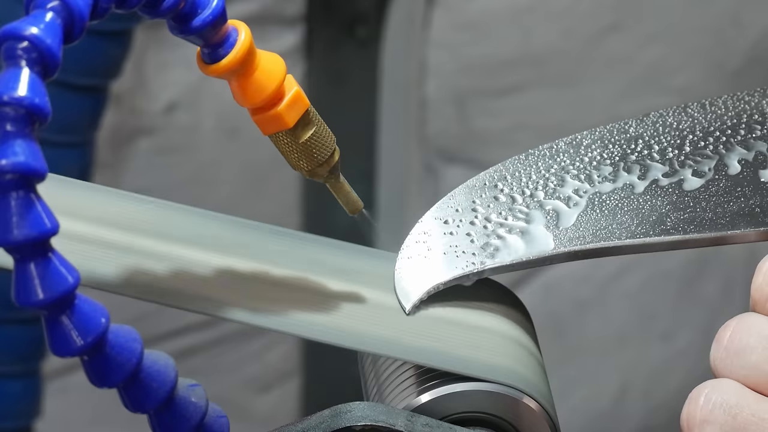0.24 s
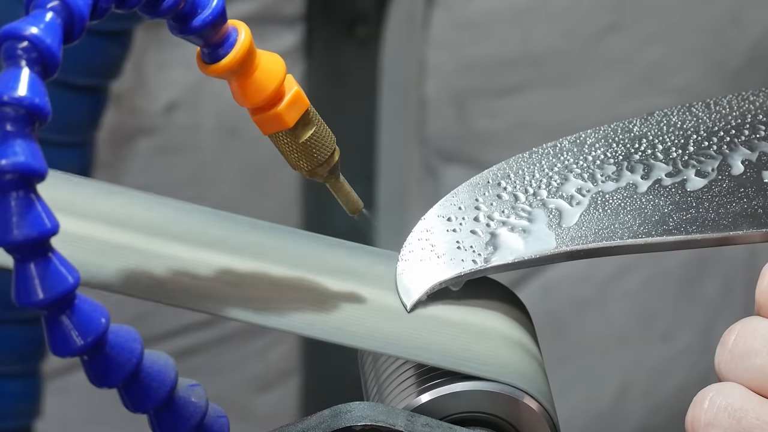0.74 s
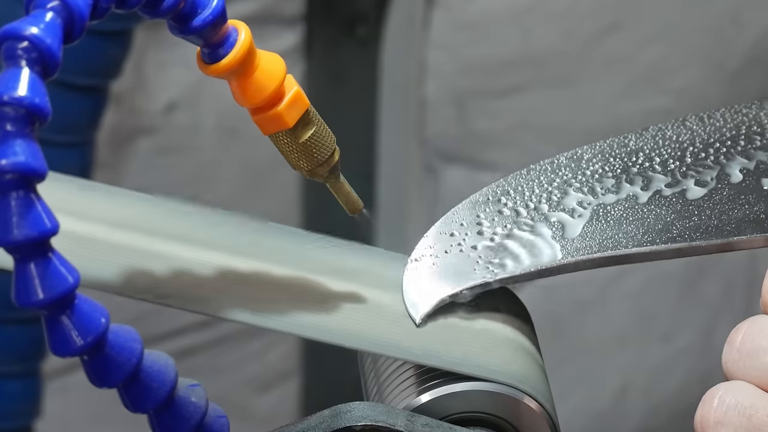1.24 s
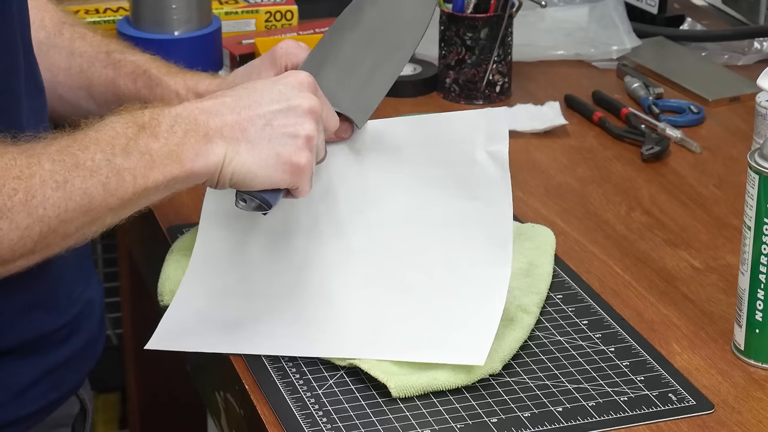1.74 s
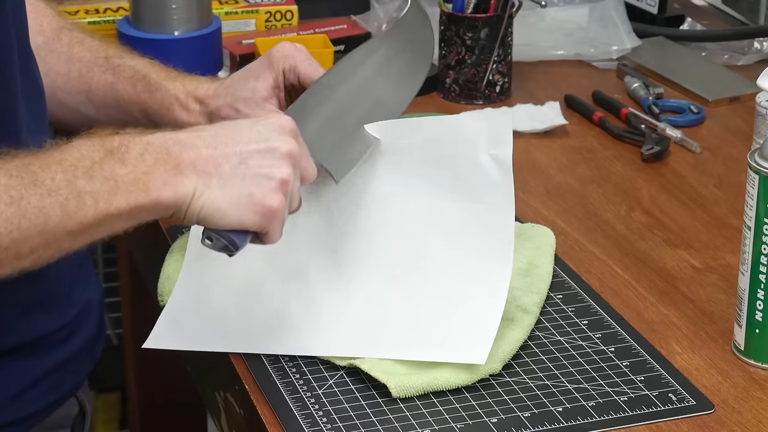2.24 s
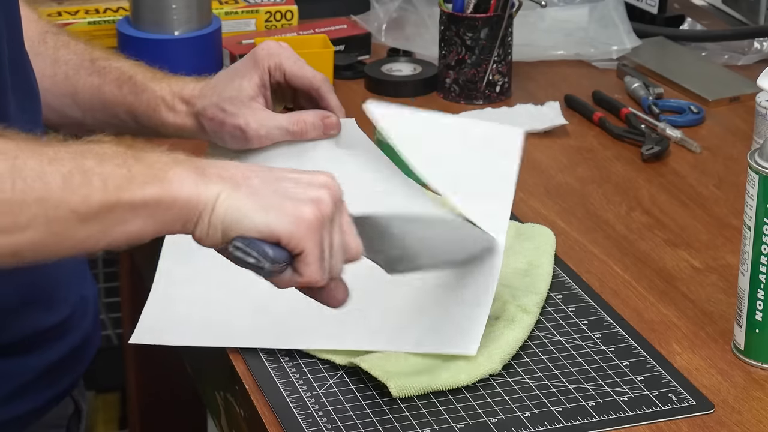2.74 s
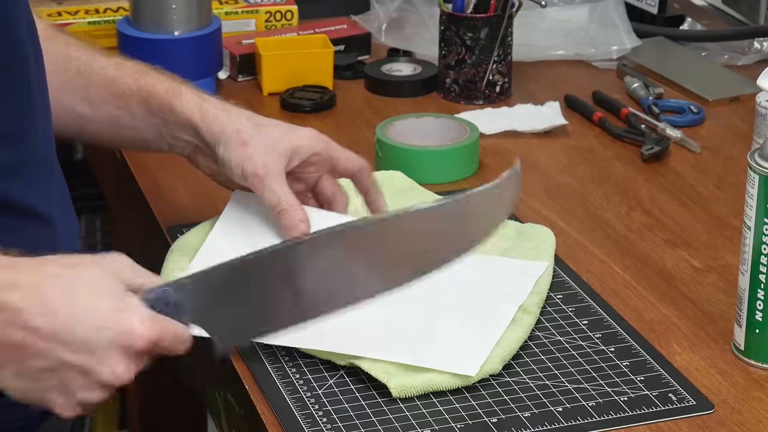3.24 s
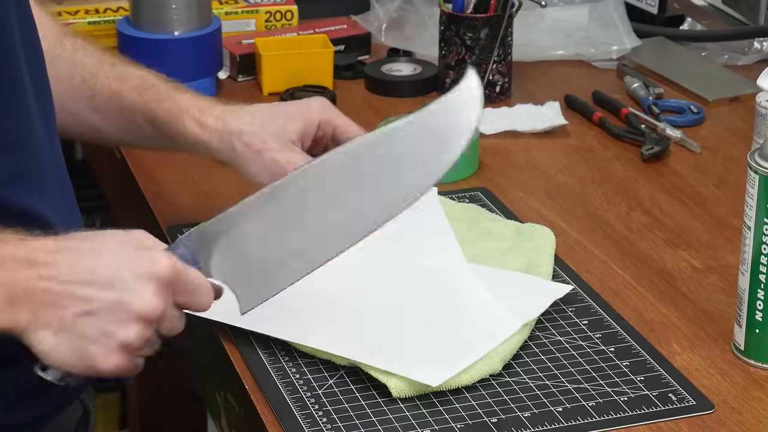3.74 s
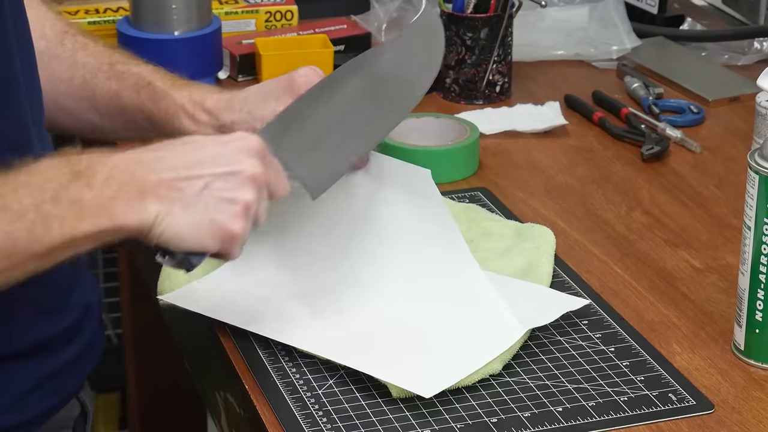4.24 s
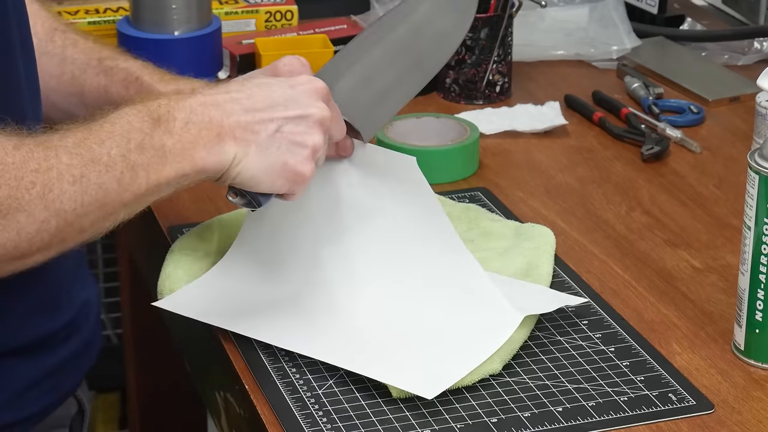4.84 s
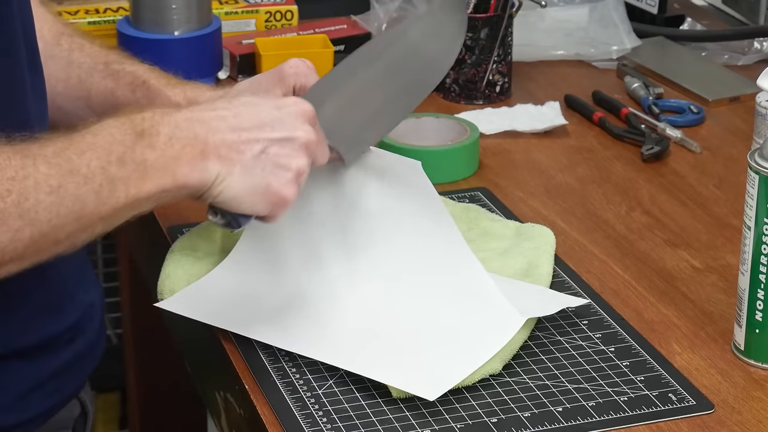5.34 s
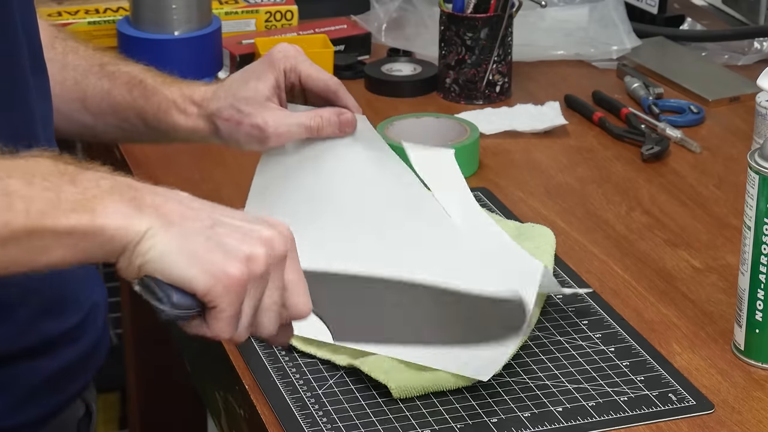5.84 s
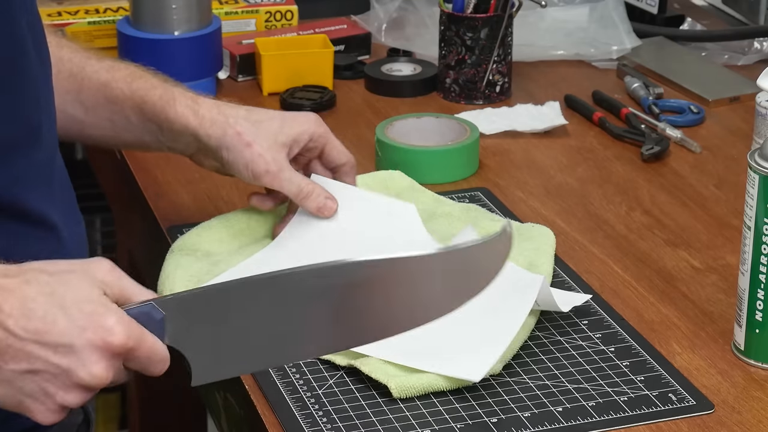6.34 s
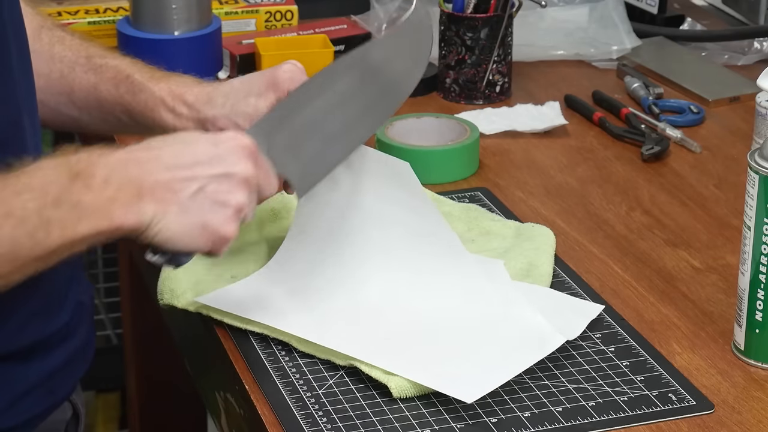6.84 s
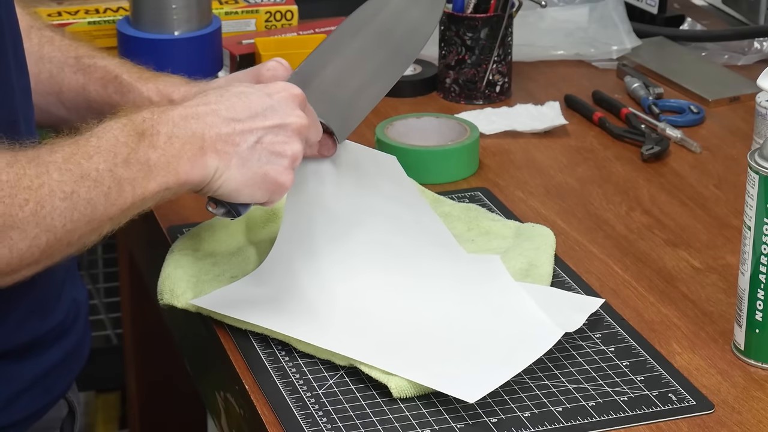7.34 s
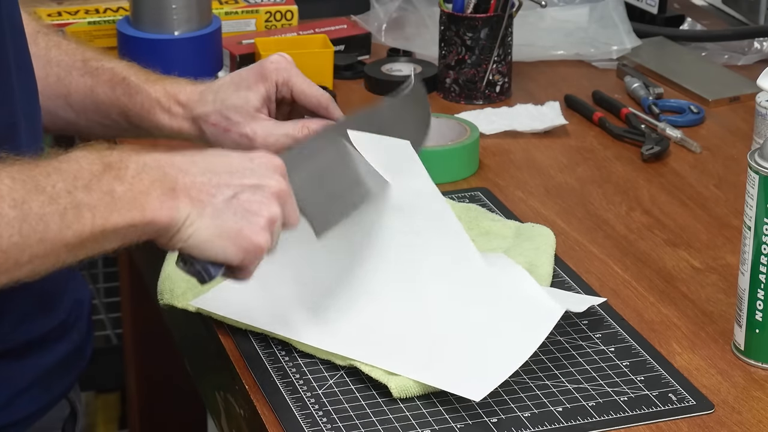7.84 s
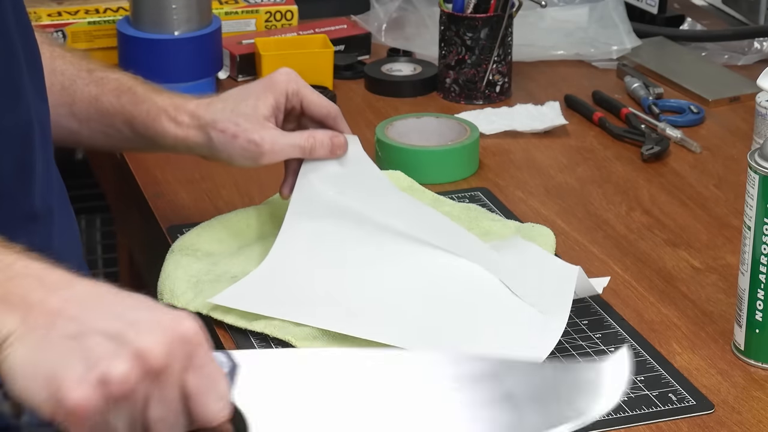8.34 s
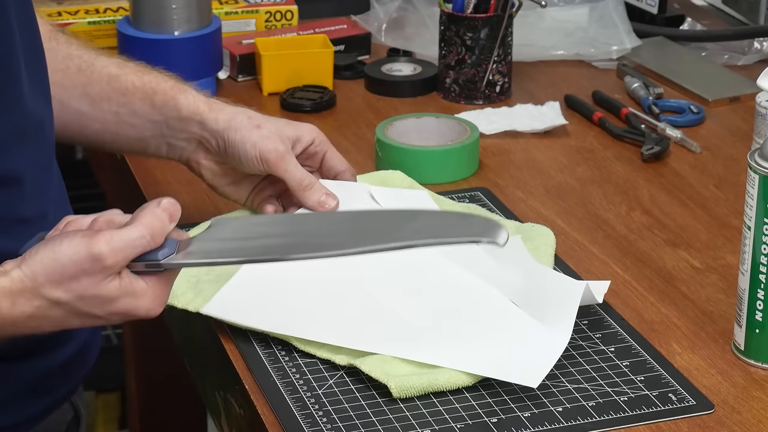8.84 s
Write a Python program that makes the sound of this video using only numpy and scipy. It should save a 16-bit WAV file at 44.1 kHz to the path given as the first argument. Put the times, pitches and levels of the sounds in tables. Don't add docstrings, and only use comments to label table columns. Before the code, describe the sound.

From 0 to 1.4 seconds a belt grinder runs close by: a dense bright hiss of grit and mist, with high, thin metallic whistles around it, wavering and beating as the blade rubs. It cuts abruptly to a quiet workshop with wide, soft air and faint low fan hum. Paper slides lightly; at 1.8 creases crackle and the taut sheet squeaks, rising in pitch near 2.1. A knife slices from 2.2 to 2.8, a crisp, fibrous rip that ends fizzy and fast. The sheets slide and flap, with a sharp pop at 3.8 and ticks until 4.4. After near quiet, snaps at 5.3 begin a second, quicker slice until about 5.9. Rustling and ticking continue to 6.9. Harder snaps at 7.6 start the third slice, rushing through until 8.15, with a soft landing. Light slides and small flaps close the scene near 9, in a short room.

```python
import sys
import numpy as np
from scipy import signal
from scipy.fft import rfft, irfft
from scipy.io import wavfile
from scipy.ndimage import uniform_filter1d

SR = 44100
rng = np.random.default_rng(int(sys.argv[2]) if len(sys.argv) > 2 else 0)


def dump_mix(stems):
    frames = np.atleast_2d(stems).T
    limited = np.clip(frames, -1, 1)
    pcm = np.round(limited * 32767).astype(np.int16)
    wavfile.write(sys.argv[1], SR, pcm)


def convert_level_to_amplitude(level_db):
    exponent = np.asarray(level_db, float) / 20
    return 10 ** exponent


N = 401310
HZ = np.fft.rfftfreq(8192, 1 / SR)


def evened(x):
    return x / np.sqrt(np.mean(x ** 2) + 1e-20)


def read(points, hz):
    f, value = np.transpose(points)
    return np.interp(np.log(hz + 1), np.log(f + 1), value)


def curves(rows):
    s, *columns = np.transpose(rows)
    return [np.interp(np.arange(N) / SR, s, c) for c in columns]


def coloured(x, gain):
    ceps = irfft(np.log(np.maximum(gain, 1e-5)))
    ceps[1:4096] *= 2
    ceps[4097:] = 0
    impulse = irfft(np.exp(rfft(ceps)))[None, :4096]
    return signal.oaconvolve(np.atleast_2d(x), impulse, axes=1)[:, :N]


def modes(table, sharp):
    return sum(convert_level_to_amplitude(db) ** 2 / (1 + (2 * (HZ - hz) / width) ** 2) ** sharp for hz, width, db in table)


def drift(per_s):
    points = rng.standard_normal(N // 256 + 2)
    slow = signal.filtfilt(*signal.butter(2, np.clip(per_s * 512 / SR, 1e-3, .9)), points)
    return np.interp(np.arange(N) / 256, np.arange(len(slow)), evened(slow))


def pair(gain, side_db, patchy_db, count):
    hz = HZ[::8]
    a, b, c, d, patches = rng.standard_normal((count // 256 + 5, len(hz), 5)).T
    patches = uniform_filter1d(patches, size=10, axis=0)
    patches = evened(uniform_filter1d(patches, size=12, axis=1))
    side = (c + 1j * d) * convert_level_to_amplitude(read(side_db, hz))[:, None]
    z = np.array([a + 1j * b, side]) * convert_level_to_amplitude(patchy_db * patches)
    noise = signal.istft(z, nperseg=1024, noverlap=768)[1][:, :count]
    mid, side = coloured(noise, gain)[:, :count]
    return np.array([mid + side, mid - side]) / np.std(mid)


def resonate(x, hz, width):
    turn = np.exp(2j * np.pi * np.cumsum(hz) / SR)
    r = np.exp(-np.pi * width / SR)
    return evened((turn * signal.lfilter([1 - r], [1, -r], x / turn)).real)


# (pitch [Hz], pitch waver [Hz], flutter [dB])
WHISTLES = [(3380, 10, 1.5), (6745, 12, 2), (5075, 20, 2.5), (8490, 18, 2), (11890, 25, 2), (1810, 6, 1.5)]
# (beat rate [1/s], rate change [1/s^2], depth [0-1], grit fuzz [dB])
BEATS = [(17.2, -7.5, .6, -10), (14, 2, 0.35, 0), (12, 0, 0.23, 1), (9, 1, .2, 3), (11, 1, .25, 8),
         (8, 1, .2, -2)]
# (time [s], level of each of six whistles [dB])
SING = [(0, -45, -46, -52, -47, -54, -54), (.3, -42, -45, -54, -46, -53, -53),
        (.5, -46.5, -38.5, -50, -44, -51, -53), (.8, -46, -40, -52, -45, -52, -53),
        (1, -48, -47.5, -57, -49, -55, -54), (1.15, -42, -39, -53, -44, -50, -53),
        (1.4, -43.5, -39.5, -44.5, -45, -50, -53)]


def whistles(n):
    t = np.arange(n) / SR
    out = np.zeros((2, n))
    phase_rad = np.array([[0], [.4]])
    for db, beat_row, (hz, waver_hz, flutter_db) in zip(curves(SING), BEATS, WHISTLES):
        per_s, change, depth, fuzz_db = beat_row
        beat = abs(1 - depth * np.exp(2j * np.pi * (per_s + .5 * change * t) * t))
        turns = 2 * np.pi * np.cumsum(hz + waver_hz * drift(43.6)[:n]) / SR
        pitch_hz, fuzz_width_hz = np.full(n, hz), 160
        fuzz = resonate(rng.standard_normal(n), pitch_hz, fuzz_width_hz)
        fuzz = resonate(fuzz, pitch_hz, fuzz_width_hz)
        tone = np.sin(turns + phase_rad) + convert_level_to_amplitude(fuzz_db - 3) * fuzz
        level = convert_level_to_amplitude(db[:n] + 5.0 + flutter_db * drift(38)[:n])
        out += beat * level * tone / np.hypot(1, convert_level_to_amplitude(fuzz_db))
    return out


# (frequency [Hz], density [dB per Hz])
HISS = [(18, -79), (30, -40), (479, -20), (622, -22), (1050, -12.5), (1330, -11.5), (1770, -11),
        (2990, -13.5), (3400, -3.5), (3780, -7), (5890, -9), (6720, -4.5), (7860, -13), (8720, -10),
        (10400, -11.5), (11300, -16), (12600, -18), (13500, -17), (15500, -19)]
# (frequency [Hz], side minus mid [dB])
HISS_SIDE = [(60, -13), (150, -5), (380, -10), (950, -6.5), (2380, -8), (5980, -11.5), (15000, -5.5)]
# (frequency [Hz], width [Hz], level [dB])
BLADE_ON_BELT = [(1080, 98, -15), (1800, 46, -11), (3380, 35, -1), (3960, 44, -13), (5060, 97, -10),
                 (5610, 44, -14), (6750, 54, 0), (7470, 47, -15), (7690, 37, -17), (8500, 78, -3.5),
                 (9680, 63, -11), (10100, 140, -13.5), (10700, 84, -15), (11900, 100, -10),
                 (13200, 130, -19), (13400, 93, -18), (14300, 68, -24), (14800, 34, -25)]


def grinder():
    n = 3 * SR // 2
    hiss_db = -33.5 + .5 * drift(3.5)[:n]
    hiss = convert_level_to_amplitude(hiss_db - 3.0) * pair(convert_level_to_amplitude(read(HISS, HZ)), HISS_SIDE, patchy_db=1.44, count=n)
    fuzzy = [m for m in BLADE_ON_BELT if min(abs(m[0] - w[0]) for w in WHISTLES) > 100]
    ring = pair(np.sqrt(modes(fuzzy, 1.77)), HISS_SIDE, patchy_db=1.8, count=n)
    ring = convert_level_to_amplitude(hiss_db - 11.0) * ring + whistles(n)
    bounce = convert_level_to_amplitude(0.65 * drift(33)[:n])
    return np.pad((hiss + ring) * bounce, [(0, 0), (0, N - n)])


# (frequency [Hz], drift [Hz], level [dB], waver [dB])
HUM = [(64.7, 18.3, -69.5, 5), (82.5, 4.4, -60, 2), (112, 16, -66, 2), (135, 13.94, -67, 5)]


def fans():
    out = np.zeros((2, N))
    leads_rad = [0.55, .25, 0.51, 1.2]
    for (hz, drift_hz, db, waver_db), lead in zip(HUM, leads_rad):
        turns = 2 * np.pi * np.cumsum(hz + .5 * drift_hz * drift(16)) / SR
        out += convert_level_to_amplitude(db + 2 + waver_db * drift(11)) * np.sin(turns + np.array([[0], [lead]]))
    return out * convert_level_to_amplitude(np.array([[.6], [-.6]]))


# (frequency [Hz], density [dB per Hz])
SHOP = [(94, -27), (160, -3.5), (209, -11), (230, -12.5), (268, -6.5), (295, -13.5), (425, -20),
        (515, -16.5), (673, -27.5), (769, -20), (880, -29), (8270, -33), (15600, -39)]
# (frequency [Hz], side minus mid [dB])
SHOP_SIDE = [(60, -15), (130, -5), (290, 4), (640, 10.5), (1410, 12.5), (3100, 4), (6820, -4.5),
             (15000, -2)]


def shop():
    return convert_level_to_amplitude(-64) * pair(convert_level_to_amplitude(read(SHOP, HZ)), SHOP_SIDE, patchy_db=0.4, count=N)


# (start [s], length [s], effort [dB], speed [dB], sheet boom [dB])
SLIDES = [(1.399, 0.27, -61.5, -8.5, -0.5), (2.98, 0.35, -59.5, -0.3, -3.5), (3.217, 0.27, -61, -9.5, -6),
          (3.382, 0.41, -51, -4.5, -12.5), (4.045, 0.13, -54, -13, -3.5), (4.3, 0.9, -74, -6, -1),
          (6.027, 0.13, -49, -9.5, 0), (6.1, .68, -52, -6, -11), (6.487, 0.5, -58, -10.5, -16),
          (6.953, 0.33, -71.5, -4, -5), (7.4, 0.24, -76, -4, -1.5), (8.3, .26, -65, -8, -5),
          (8.686, 0.33, -61.5, -13, -7), (8.983, 0.25, -62.5, -5, -8)]
# (start [s], time to lose 20 dB [s], effort [dB], speed [dB], sheet boom [dB])
FLAPS = [(1.688, 0.4, -64, -7, 3), (3.46, 0.6, -52, -5, -5), (3.80, 0.2, -38.5, -19, -10),
         (3.99, 0.12, -55, -2, -7), (4.21, 0.14, -58, -11, -2), (4.275, .06, -57, -7, -2.5),
         (4.334, .06, -57, -6, -4), (4.43, .055, -56, -8, -4), (5.195, 0.2, -66, -15, 6),
         (7.245, 0.2, -52, -10, -6.5), (8.505, 0.4, -53, -5.5, -11), (8.93, 0.1, -56, -8.5, -2.5)]
# (time [s], edge effort [dB], edge speed [dB])
BITES = [
    [(1.79, -56, -8), (1.816, -46, -6), (1.916, -51.5, -3.5), (1.976, -45.5, -2.5), (2.032, -34.5, -13),
     (2.084, -37, -10), (2.19, -42, -14)],
    [(5.27, -53, -13), (5.276, -52.5, -10), (5.334, -27, -21), (5.346, -36.5, -14), (5.4, -35, -10.5)],
    [(7.565, -56, -21), (7.573, -36.5, -20), (7.613, -30, -21.5), (7.633, -45, -16), (7.651, -27.5, -21),
     (7.663, -34, -15), (7.69, -29, -7.5)],
]
# (time [s], edge effort [dB], edge speed [dB])
SLICES = [
    [(2.2, -39, -13), (2.26, -32.5, -13.5), (2.374, -28, -9), (2.512, -32, -10), (2.666, -30.5, -10),
     (2.682, -34, -3), (2.748, -29.5, -4.5), (2.786, -34.5, 3), (3.05, -62, -8)],
    [(5.41, -36, -12), (5.55, -28.5, -7), (5.682, -26, -7), (5.718, -29, -3), (5.744, -28, -6),
     (5.83, -32.5, 1), (5.936, -47.5, -4), (6.04, -55.5, -6)],
    [(7.7, -32, -8), (7.728, -29, -13.5), (7.914, -25, -7.5), (7.945, -27, -2), (7.98, -26.5, -7),
     (8.03, -28.5, 0.5), (8.09, -28.5, 0.5), (8.15, -39.5, -3), (8.42, -65, -9)],
]
SHEET_DB = [-1.5, -3, -4, -3.5, -8, -6.5]


def motions():
    t = np.arange(0, N + 64, 64) / SR
    rise_s, let_go_s = .01, 0.056
    for rows, boom_db in zip(BITES + SLICES, SHEET_DB):
        s, effort_db, speed_db = np.transpose(rows)
        edges_db = -60 * np.maximum((s[0] - t) / rise_s, (t - s[-1]) / let_go_s).clip(0)
        db = np.interp(t, s, effort_db) + edges_db
        keen = np.clip((db + 62) / 12, 0, 1)
        yield db, np.interp(t, s, speed_db) + 3 * (2 * keen - 1), boom_db
    swell_db = -14.5
    for s, length, db, speed_db, boom_db in SLIDES:
        yield db + swell_db * (2 * (t - s) / length - 1) ** 2, speed_db, boom_db
    flap_rise_s = .016
    for s, length, db, speed_db, boom_db in FLAPS:
        u = t - s - flap_rise_s
        yield db - np.maximum(20 * u / length, -20 * u / flap_rise_s), speed_db, boom_db


def hands():
    sums = 0
    for db, speed_db, boom_db in motions():
        power = convert_level_to_amplitude(db) ** 2 + 1e-12
        sums = sums + power * np.array([1 + 0 * db, speed_db + 0 * db, boom_db + 0 * db])
    slow = 10 * np.log10(sums[0]), sums[1] / sums[0], sums[2] / sums[0]
    return [np.interp(np.arange(N) / 64, np.arange(len(c)), c) for c in slow]


# (frequency [Hz], density [dB per Hz])
FIBRES = [(88, -57), (150, -20), (209, -18.5), (374, -10), (619, -9.5), (709, .3), (845, -6.5), (968, 1),
          (1950, 2.5), (5140, 0.5), (7400, -9.5), (8900, -6.5), (10500, -9), (15600, -22.5)]
# (frequency [Hz], width [Hz], level
# [dB])
COMB = [(712, 36, -7), (988, 32, -4), (1270, 55, -3), (1470, 40, -8), (1710, 50, 0), (1975, 50, 1),
        (2275, 50, -1), (2565, 60, -2), (2800, 50, -1), (3010, 70, -2),
        (3330, 80, -5), (3660, 70, -5), (3990, 70, -5), (4360, 70, -4), (4660, 50, -3), (4965, 60, -3),
        (5310, 60, -5), (5715, 70, -6), (6800, 60, -9)]
# (time [s], pitch [Hz], tension [dB])
FLUTTER = [
    [(2.2, 5000, -1), (2.42, 5000, -1), (2.5, 4470, 1), (2.67, 4490, 1), (2.73, 5300, -1), (2.8, 5600, 0),
     (3.0, 5190, 0)],
    [(5.45, 4900, 0), (5.59, 4800, 1), (5.63, 4900, -1), (5.69, 4850, 2), (5.77, 4670, 3.5),
     (5.83, 4700, -2), (6.0, 4600, 2)],
    [(6.15, 4600, 0), (6.3, 5200, 2), (6.5, 4300, 2), (6.75, 5200, 1), (6.95, 4800, 0)],
    [(7.7, 4400, -1), (7.87, 4800, -1), (7.98, 5000, 3), (8.04, 5100, -4), (8.1, 5700, 3), (8.17, 6000, 2),
     (8.32, 6200, 3.5), (8.5, 5000, -.5)],
]


def paper():
    effort_db, fizz_db, body_db = hands()
    strip_hz, tension_db = curves(sum(FLUTTER, []))
    strip_db = 0.8 + 0.49 * fizz_db + tension_db
    breaks = rng.standard_normal((4, N)) * convert_level_to_amplitude(3.1 * np.minimum(rng.exponential(1, N), 3))

    gain = np.sqrt(0.22 * convert_level_to_amplitude(read(FIBRES, HZ)) ** 2 + modes(COMB, 1.16))
    under = [1 / (1 + (HZ / hz) ** 8) for hz in (1400, 3200, 7000)]
    shares = np.maximum(np.diff([0 * HZ, *under, 1 + 0 * HZ], axis=0), 0)
    bands = [evened(coloured(b, gain * np.sqrt(share))[0]) for b, share in zip(breaks, shares)]
    body, edge, strip, fizz = bands

    flutter_width_hz = 1600
    flutter = resonate(strip, strip_hz, flutter_width_hz)
    flutter = resonate(flutter, strip_hz, flutter_width_hz)
    strip = strip + convert_level_to_amplitude(-12 + 1.2 * tension_db) * flutter
    bend_hz = 2300 + 420 * drift(4)
    edge = edge + .08 * resonate(edge, bend_hz, 300)

    jerks_db = 0.76 * drift(44)
    out = np.zeros(N)
    for x, db in zip((body, edge, strip, fizz), (body_db, 0, strip_db, fizz_db)):
        out += convert_level_to_amplitude(effort_db - 1.0 + db + jerks_db + 1.32 * drift(10.7)) * evened(x)
    return out


# (time [s], level [dB], pitch [Hz])
SQUEAK = [
    (1.79, -59, 1000),
    (1.828, -40, 1040),
    (1.934, -45, 1095),
    (2.024, -42, 1070),
    (2.07, -38.5, 1200),
    (2.096, -30, 1240),
    (2.116, -49, 1210),
    (2.13, -36, 1240),
    (2.17, -45.5, 1180),
]


def squeak():
    a, b = round(SQUEAK[0][0] * SR), round(SQUEAK[-1][0] * SR)
    level_db, hz = (c[a:b] for c in curves(SQUEAK))
    ring = resonate(resonate(rng.standard_normal(b - a), hz, 55), hz, 55)
    return np.pad(convert_level_to_amplitude(level_db - 3.0 + 3.3 * drift(30)[a:b]) * ring, (a, N - b))


# (time [s], peak [dB], ring [Hz], broad crack [dB])
SNAPS = [(1.805, -30, 991, 8), (1.829, -25, 1010, 9), (1.86, -26.5, 1070, 3), (2.087, -36, 1260, -4),
         (2.24, -25, 2270, -11), (5.271, -35, 2570, -2.5), (5.285, -27, 2000, -4), (5.301, -28, 1280, 4),
         (5.313, -24, 1920, -2.5), (5.322, -24.5, 2560, 5), (5.331, -16, 2700, 4), (7.567, -31, 1990, -5),
         (7.603, -13, 1880, -0.5), (7.611, -29, 1960, -5), (7.644, -14, 1360, 6), (7.648, -14, 1450, 2),
         (7.681, -17, 1670, -7)]
# (time [s], peak [dB], ring [Hz], t60 [s], broad crack [dB])
LANDINGS = [
    (2.82, -40, 330, .25, -25),
    (5.312, -39, 300, .08, -25),
    (6.08, -48, 370, .06, -25),
    (8.16, -43, 330, .1, -25),
]
# (time [s], peak [dB], ring [Hz])
TICKS = [(3.283, -36.5, 4400), (3.695, -36.5, 2290), (3.764, -33.5, 1500), (4.098, -38, 2250),
         (4.211, -47, 2130), (4.281, -43, 2350), (4.341, -43, 2040), (4.437, -38.5, 2300),
         (5.198, -49, 1000), (5.232, -48, 2570), (6.076, -33, 1280), (6.236, -42, 1270), (6.281, -41, 1970),
         (6.347, -35, 3290), (6.579, -37, 2600), (6.714, -41, 5400), (6.746, -43, 2780), (6.817, -36, 2300),
         (6.819, -40, 5300), (7.218, -44, 950), (7.252, -37, 2270), (8.519, -50, 2260), (8.945, -44, 2710)]
# (time [s], peak [dB], ring [Hz], t60 [s], broad crack [dB])
POP = [
    (3.777, -28, 1060, 0.023, -4),
    (3.789, -10.5, 2050, .02, -14),
    (3.79, -24, 950, .05, -25),
    (3.788, -39, 390, .02, -25),
    (3.792, -17, 4300, .012, -8),
    (3.7935, -11, 2150, .014, -10),
    (3.808, -25, 1600, .03, -6),
]


def snaps():
    out, t = np.zeros(N), np.arange(4000) / SR
    rows = [(s, db, hz, 0.018, crack_db) for s, db, hz, crack_db in SNAPS]
    rows += [(s, db, hz, 0.022, -4.5) for s, db, hz in TICKS]
    rows += POP + LANDINGS
    noise = rng.standard_normal((len(rows), len(t)))
    broad = signal.butter(4, [330, 6200], "bandpass", fs=SR, output="sos")
    for burst, (s, db, hz, t60, crack_db) in zip(noise, rows):
        click = 3 * np.exp(-(t / 0.00011 - 2) ** 2)
        kick = burst * convert_level_to_amplitude(-60 * t / max(t60, .004)) + click
        ring = signal.lfilter(*signal.butter(2, [.8 * hz, 1.25 * hz], "bandpass", fs=SR), kick)
        tone = evened(ring) + convert_level_to_amplitude(crack_db) * evened(signal.sosfilt(broad, kick))
        part = out[round(s * SR):][:len(t)]
        part += (convert_level_to_amplitude(db - 3) * tone / abs(tone).max())[:len(part)]
    return out + convert_level_to_amplitude(-3) * np.roll(out, round(.00352 * SR))


# (frequency [Hz], level [dB], t60 [s])
BENCH = [(1280, -7, .3), (1585, -3, .5), (1607, -3, .5), (1900, -7, .5), (2110, -1.5, .45), (2850, -8, .3),
         (3320, -10, .3), (4500, -11, .2)]


def pop_ring():
    t, out = np.arange(SR // 2) / SR, np.zeros(N)
    ring = np.zeros(len(t))
    for hz, db, t60 in BENCH:
        ring += convert_level_to_amplitude(db - 60 * t / t60 + 3.0 * drift(30)[:len(t)]) * np.sin(2 * np.pi * hz * t)
    out[round(POP[1][0] * SR):][:len(t)] = convert_level_to_amplitude(-37) * ring
    return out


# (frequency [Hz], t60 [s])
ROOM = [(250, 0.86), (1000, 0.34), (3000, 0.22), (8000, 0.36), (15000, 0.09)]
# (frequency [Hz], side minus mid [dB])
ROOM_SIDE = [(150, 0.5), (500, -4.5), (1500, -1.5), (4500, -4.5), (9000, -1.5), (15000, 9)]


def room(x):
    taps = np.zeros((2, SR))
    at = np.arange(200, SR - 20, 20) + rng.integers(0, 20, (2, (SR - 201) // 20))
    np.put_along_axis(taps, at, rng.choice([-1., 1.], at.shape), 1)
    hz, t, z = signal.stft(taps, SR, nperseg=256)
    decay = convert_level_to_amplitude(-60 * t / read(ROOM, hz)[:, None])
    width = convert_level_to_amplitude(np.array([0 * hz, read(ROOM_SIDE, hz)]))[..., None]
    tail = signal.istft(z * decay * width, SR, nperseg=256)[1]
    tail = tail / np.linalg.norm(tail[0])
    mid, side = convert_level_to_amplitude(-9.5) * signal.fftconvolve(x[None], tail, axes=1)[:, :N]
    return x * convert_level_to_amplitude(np.array([[-.3], [.3]])) + np.array([mid + side, mid - side])


def microphone(x):
    notch_hz, notch_width_hz, notch_db, top_hz = 7850, 85, -26, 15350
    dip = 1 - (1 - convert_level_to_amplitude(notch_db)) / (1 + ((HZ - notch_hz) / notch_width_hz) ** 2)
    return coloured(x, dip / (1 + (HZ / top_hz) ** 160))


def scene():
    t = np.arange(N) / SR
    change_s = 1.406
    after = np.clip((t - change_s) / .001, 0, 1)
    hum = fans() * np.minimum(t / .05, 1)
    bench = room((paper() + squeak() + snaps() + pop_ring()) * after) + shop() + hum
    return microphone((grinder() + convert_level_to_amplitude(-20.0) * hum) * (1 - after) + bench * after)


def band_limit(x):
    return signal.sosfilt(signal.butter(12, 15700, fs=SR, output="sos"), x)


def record(dry):
    return band_limit(dry)


dry = scene()
out = record(dry)
dump_mix(out)
```